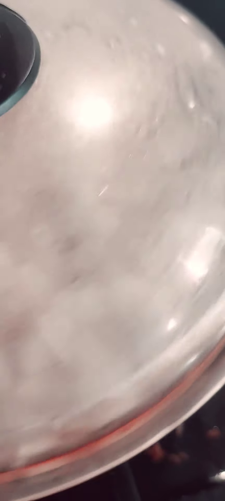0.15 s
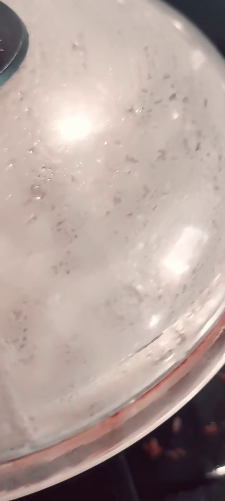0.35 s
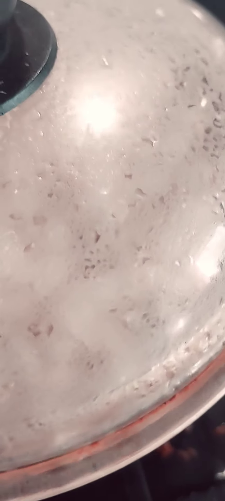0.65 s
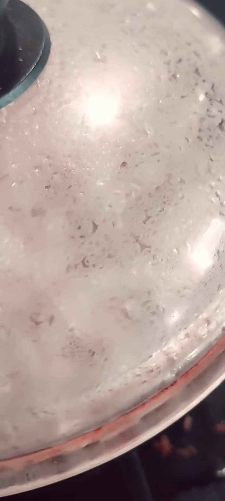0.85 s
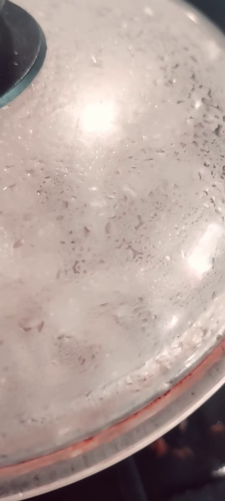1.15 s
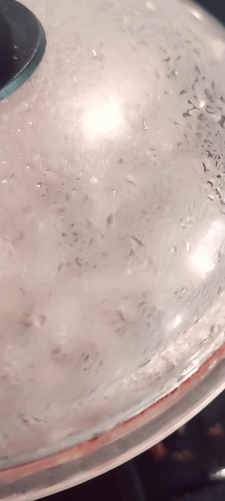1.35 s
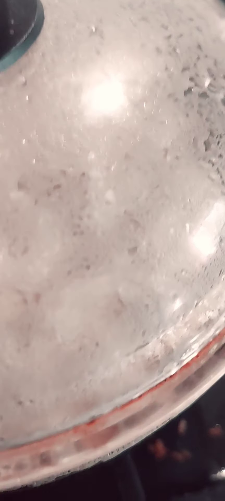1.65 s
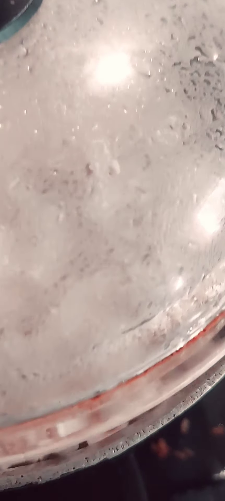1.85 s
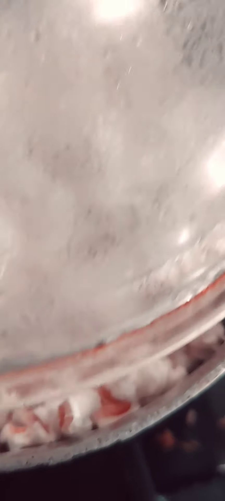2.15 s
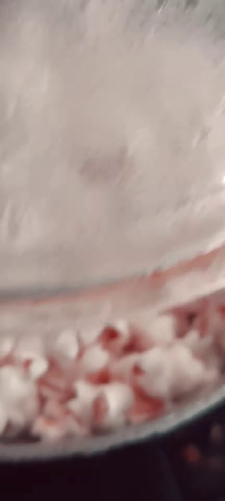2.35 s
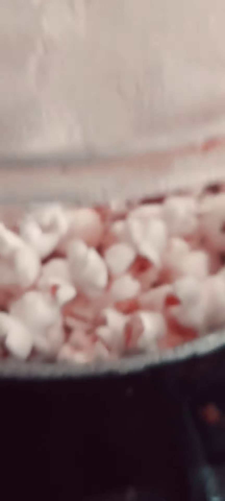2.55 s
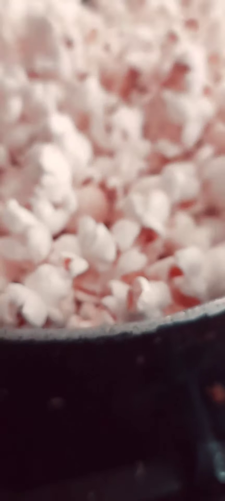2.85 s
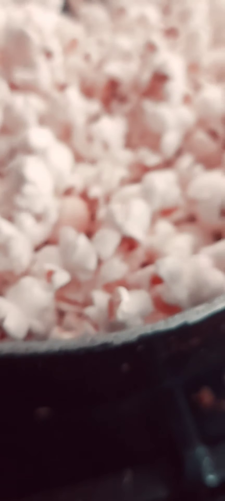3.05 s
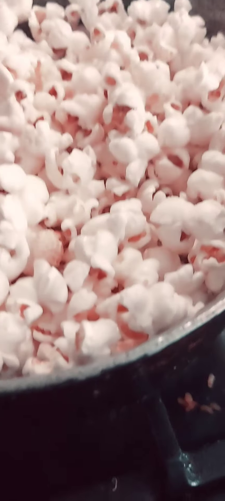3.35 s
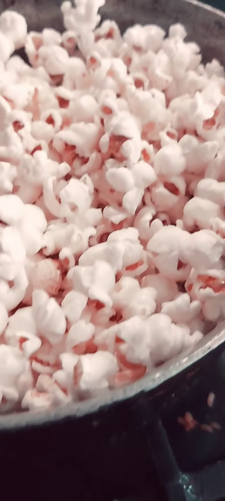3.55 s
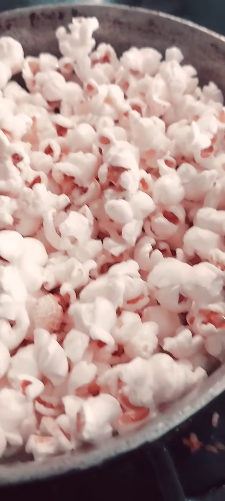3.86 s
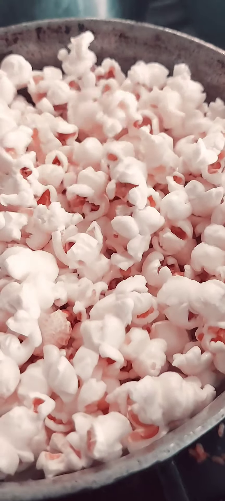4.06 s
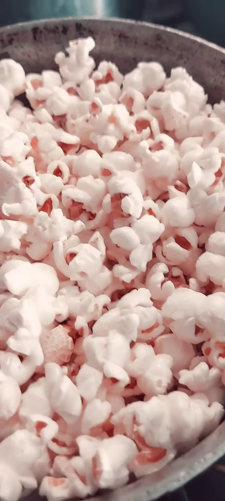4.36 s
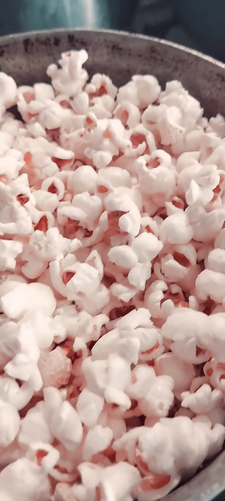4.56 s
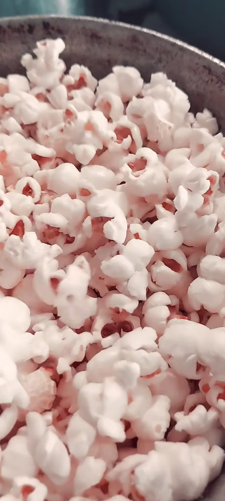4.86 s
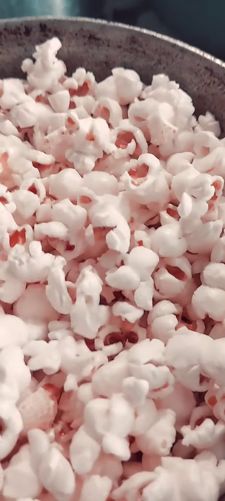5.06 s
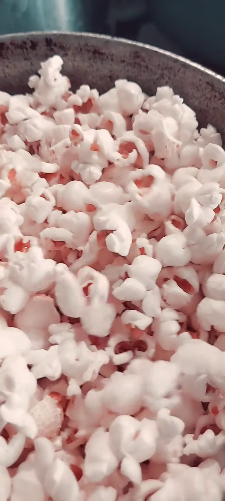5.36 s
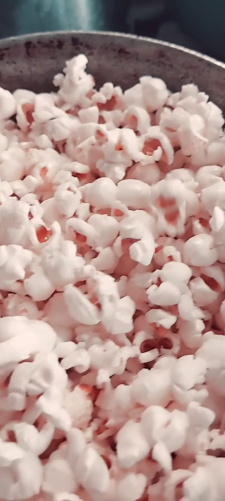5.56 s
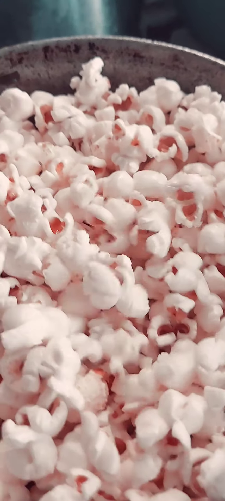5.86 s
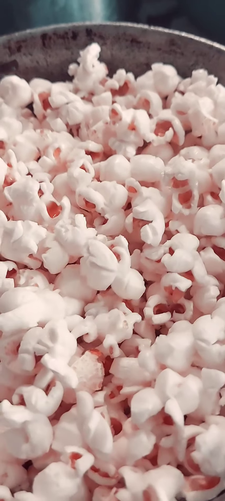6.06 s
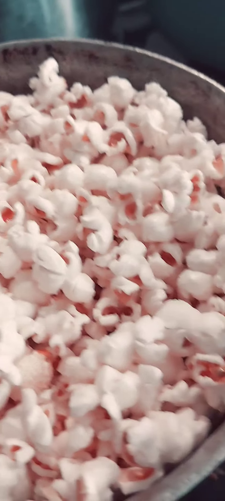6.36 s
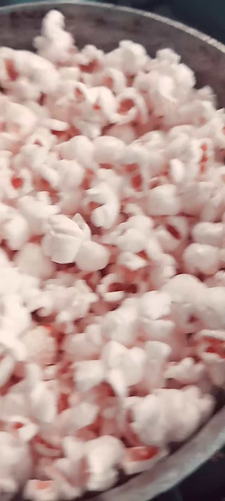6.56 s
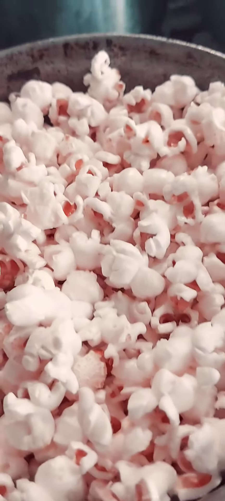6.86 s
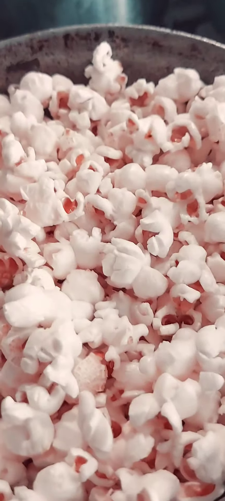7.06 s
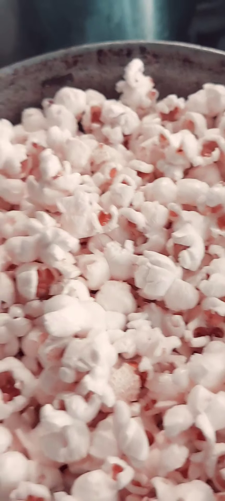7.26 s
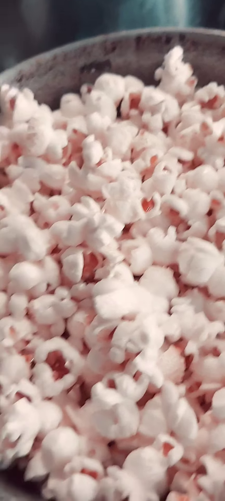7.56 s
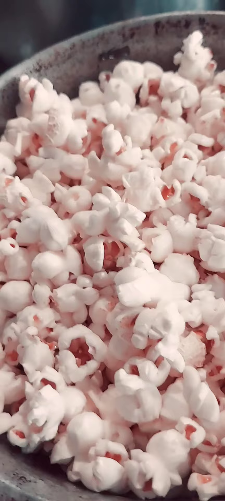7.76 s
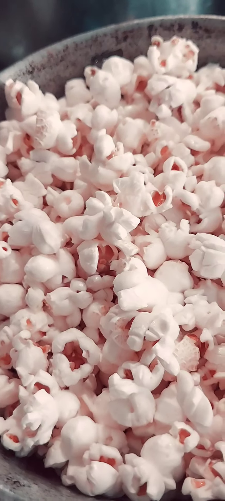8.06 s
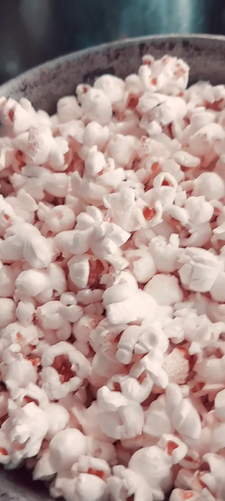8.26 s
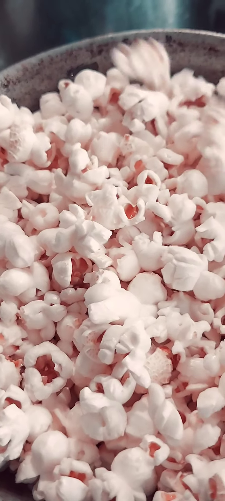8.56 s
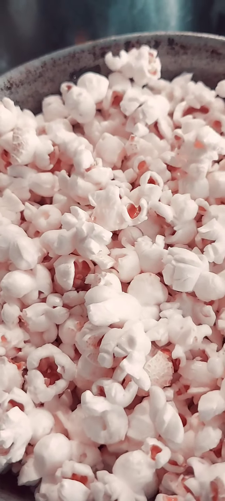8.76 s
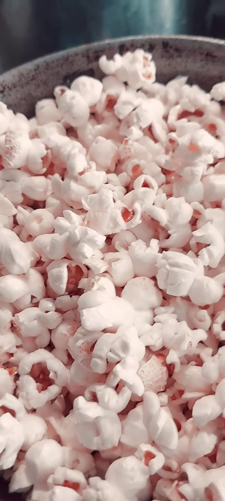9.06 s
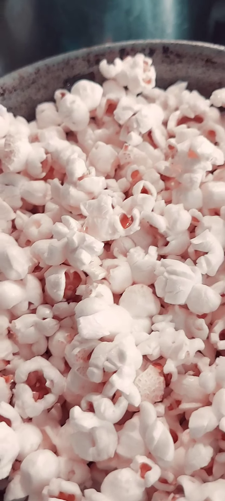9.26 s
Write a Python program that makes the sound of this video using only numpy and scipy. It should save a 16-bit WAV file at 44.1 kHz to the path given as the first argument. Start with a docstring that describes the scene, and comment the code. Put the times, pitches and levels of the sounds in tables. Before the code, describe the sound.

Popcorn bursts with hollow muffled booms under a glass lid, then sharp open cracks, over soft oil sizzle and low stove hum.

```python
"""Popcorn pops in a pot of hot oil near a handheld phone: shaped noise bursts through resonances.
Under the glass lid each pop adds a decaying boom of the pot's air; later pops are open, sharp cracks with echoes.
Some puff steam at the left microphone (slow swing); thrown kernels and flakes tick (short noise).
The lid rings (decaying modes) and its rim rattles (random contacts) as it is set down.
Oil spits and sizzles and the stove hums (coloured noise); kernels squeak faintly (sinking noisy tones)."""
import sys
import numpy as np
from scipy import signal
from scipy.fft import rfft, irfft
from scipy.io import wavfile

SR = 44100
rng = np.random.default_rng(int(sys.argv[2]) if len(sys.argv) > 2 else 0)


def file_out(sig):
    """Save sig as 16-bit WAV at sys.argv[1]."""
    # one column per channel
    cols = np.atleast_2d(sig).T
    # limit, then scale
    lim = np.clip(cols, -1, 1)
    pcm = np.round(lim * 32767).astype(np.int16)
    wavfile.write(sys.argv[1], SR, pcm)


N = 414981
TIME = np.arange(N) / SR
SHOT = 8192  # samples of a short sound
AGE = np.arange(SHOT) / SR

# pops under the seated or tilted lid: start_s, boom_db, boom_hz, crack_db, treble_db (re crack middle)
COVERED_POPS = [(0.0, -28.5, 288, -34.5, 4), (0.096, -12, 287, -16, 1), (0.166, -28, 288, -24.5, 2),
                (0.187, -20.5, 304, -17, 1.5), (0.4, -42, 340, -28.5, -1.5),
                (0.4364, -23.5, 398, -26.5, -0.5), (0.5214, -15.5, 350, -16.5, -0.5),
                (0.686, -33, 388, -21.5, -3), (0.7775, -21.5, 342, -17.5, 1.5),
                (0.885, -27.5, 340, -30, -4), (0.967, -38, 348, -31, 3), (0.981, -24.5, 320, -23, 4),
                (1.1259, -20.5, 320, -25, 1), (1.2156, -16, 333, -24.5, -5.5),
                (1.375, -16.5, 384, -26.5, 2), (1.4337, -24.5, 402, -22.5, -1),
                (1.8348, -31.5, 387, -16, -1), (2.1440, -23.5, 506, -33, 14), (2.2113, -29, 385, -28, -4)]
# pops in the open pot: start_s, crack_db, resonance_hz, hollow_db (re crack), room_db (re crack)
OPEN_POPS = [(1.8346, -20, 3800, -15, -13), (2.144, -24, 6500, -19, -23), (2.2103, -11.5, 2200, -8, -11.5),
             (2.7854, -18.5, 4420, -40, -2), (3.03, -17, 1820, -8.5, -6.5),
             (3.183, -14.5, 4060, -17, -13.5), (3.199, -20.5, 4970, -2.5, -5),
             (3.268, -15.5, 4800, -29, -13), (3.9043, -18.5, 4900, -6, -7), (3.9218, -23, 5850, -10, -2),
             (4.1841, -16, 3400, -8, -14), (4.753, -9.5, 2840, -11, -16), (4.8907, -20.5, 7500, -0.5, -10),
             (4.989, -19, 6150, -10.5, -13), (5.042, -23, 6350, -8, -10.5), (5.1022, -19, 5270, -2.5, -5),
             (5.2185, -19.5, 4630, -8, -8), (5.3436, -14.5, 2730, -8, -8.5), (5.4126, -15, 4300, -10, -9.5),
             (5.4795, -15, 3500, -18, -7.5), (5.8323, -16.5, 5630, -16, -7), (6.241, -14, 3560, -12, -8),
             (6.549, -18, 4050, -7.5, -12.5), (6.656, -17, 3900, -14, -10.5), (6.697, -23, 3360, -2, -4),
             (6.8024, -20, 5600, -5, -14), (7.717, -13, 3400, -4.5, -10.5), (7.8948, -17, 3900, -7.5, -14),
             (8.564, -16, 4600, -10, -4), (8.6902, -13.5, 2500, -5.5, -15.5),
             (9.3136, -13.5, 5300, -6.5, -12)]
# steam puffs at the left microphone: start_s, gain_db
PUFFS = [(2.785, -8), (3.1826, -1.5), (3.269, -3), (5.042, -12.5), (5.1045, -2.5), (5.22, -9), (5.836, -6),
         (6.4268, -23), (6.5501, -11), (6.657, -12), (6.8031, -11), (8.565, -4.5)]
# kernels and flakes that hit the lid, wall or heap: start_s, level_db, resonance_hz
LANDINGS = [(1.961, -30.5, 3720), (2.023, -27.5, 3500), (2.284, -25.5, 2400), (2.3818, -27.5, 5900),
            (2.7542, -28.5, 3630), (3.076, -24, 3880), (3.3446, -24.5, 6240), (3.3952, -25.5, 6040),
            (3.6605, -20.5, 2770), (4.0491, -18, 2300), (4.291, -32.5, 4900), (4.8382, -25.5, 3900),
            (5.0255, -22.5, 6800), (5.201, -19, 1640), (5.5351, -21.5, 1900), (5.5731, -22.5, 5100),
            (6.024, -36, 2480), (6.4269, -21.5, 5600), (6.6336, -23.5, 1670), (6.6808, -26, 7040),
            (6.735, -21.5, 2350), (6.8531, -26.5, 3900), (7.802, -31, 2480), (7.833, -26, 3550),
            (7.927, -31, 4000), (8.632, -22, 4000), (9.352, -22, 2100), (9.4001, -17.5, 1500)]
# kernels against the glass lid: start_s, level_db
LID_TAPS = [(0.5229, -16), (0.686, -28), (0.884, -31), (1.434, -15.5), (2.234, -31)]
# modes of such a clack: mode_hz, relative_db
TAP_MODES = [(1490, -1), (2230, 2), (3700, -9)]
# knocks on the lid: start_s, ring_db, free_ring_share (of t60), clatter_db
LID_KNOCKS = [(0.4374, -23, 1, -21), (1.835, -44, 0.42, -27), (2.146, -35.5, 0.6, -23),
              (2.2093, -37, 0.35, -25.5), (5.255, -29, 0.91, -22), (5.337, -40, 0.41, -27),
              (5.374, -32, 0.3, -13.5), (5.389, -30, 0.22, -23.5)]
# lid modes, free: mode_hz, relative_db, t60_s
LID_MODES = [(300, -7, 0.22), (436, -1, 0.16), (686, -7, 0.17), (766, -4, 0.85), (822, -8, 0.22),
             (1475, -8, 0.07), (2143, -6, 0.13), (2222, 0, 0.26), (3015, -13, 0.36), (3820, -10, 0.2)]
# rim rattle envelope during set-down: time_s, level_db
RATTLE = [(5.334, -28), (5.362, -31), (5.374, -17.5), (5.406, -30)]
# rim resonances as the lid settles: centre_hz, width_hz, gain_db
RIM = [(270, 30, 1), (682, 31, 11), (967, 24, 3.5), (1226, 33, 9.5), (2140, 18, 8), (3800, 160, -1.5)]
# water drops from the lid bursting in the oil: start_s, level_db
SPITS = [(1.2496, -27), (1.357, -29), (1.5379, -37), (1.5522, -27.5), (1.7898, -27.5), (1.966, -30),
         (2.0424, -30.5)]
# steam squeezing out of kernels: start_s, length_s, start_hz, end_hz, level_db
SQUEAKS = [(3.785, 0.19, 5230, 4230, -54), (6.966, 0.23, 4400, 3880, -58), (7.427, 0.17, 4200, 4030, -58),
           (8.346, 0.17, 4640, 4030, -50)]
# background envelopes: time_s, stove_db, sizzle_db, spit_db
BACKGROUND = [(0, -39.5, -47, -56), (.7, -43, -45.5, -42), (1.4, -44, -44.5, -42), (1.8, -46.5, -47, -54),
              (2.6, -45.5, -47, -64), (3.6, -50, -50, -64), (8.3, -49, -49.5, -57.5)]
# standing waves in the air under the lid: wave_hz
AIR_HZ = [273.5, 312.6, 341.3]
# covered-pot resonances: centre_hz, width_hz, gain_db
POT_RESONANCES = [(1535, 110, 16), (2190, 190, 12), (2980, 290, 10.5), (3690, 200, 14)]
# open-pot resonances above the heap: centre_hz, width_hz, gain_db
HOLLOW = [(730, 170, 8), (1024, 270, 2)]
# open crack spectrum: point_hz, gain_db
CRACK = [(150, -7.5), (300, -1), (480, -8), (760, -5.5), (1250, -7), (1600, 1), (2100, 0.5), (3600, 2.5),
         (5200, -3), (7000, 4.5), (9500, 1.5), (15500, -5)]
# covered crack spectrum: point_hz, gain_db
MUFFLED_CRACK = [(300, 8), (900, -9.5), (1400, -17.5), (4000, -22.5), (7000, -22), (15500, -27)]
# lid clatter spectrum: point_hz, gain_db
CLATTER = [(100, -11), (300, 1), (450, -8.5), (680, -0.5), (1000, -11.5), (1800, -14), (3900, -16),
           (5500, -42)]
# room echo spectrum: point_hz, gain_db
ROOM = [(80, -18), (300, 9), (550, 7), (800, 7), (2000, 4), (7000, 6), (10000, 3.5), (15500, 2)]
# stove hum spectrum: point_hz, gain_db
STOVE = [(25, -15), (60, -6), (120, 2), (210, -14), (320, -4), (450, -16), (850, -18.5), (1150, -19),
         (1450, -13.5), (1900, -28.5), (4000, -78)]
# oil sizzle spectrum: point_hz, gain_db
SIZZLE = [(300, -32), (2200, 10), (3000, 11.5), (3400, 21.5), (3900, 13), (6000, 11.5), (7500, 13),
          (9200, 6.5), (11000, 9), (11900, 17), (13000, 8), (14300, 15.5), (14650, 21.5), (14950, 15),
          (15400, 18.5), (15800, -24)]
# phone body's colour at the right microphone: point_hz, gain_db
RIGHT_MICROPHONE = [(300, 2), (1100, -3.5), (2200, 1), (3200, 2), (7000, 2.5), (10000, -1.5), (15000, 0.5)]

# tone of a kernel at MIDDLE_HZ, and its change per octave
MIDDLE_HZ = 3610
BASS_DB, BASS_DB_PER_OCTAVE = -8.5, -1.5
TREBLE_DB, TREBLE_DB_PER_OCTAVE = -5, 8
CRACK_SPAN_S = 0.0033
TOP_HZ = 15900


def covered_pops(boom_cycles=0.89, shorter_per_octave=1.0, crack_t60_s=0.034, crack_bass_db=-8,
                 hum_db=-12.5, hum_t60_s=0.39, reach_hz=48, echo_s=0.025, echo_db=-13):
    """Each burst thumps the air shut in the pot and rattles its walls through the lid."""
    out = np.zeros((2, N))
    for start_s, boom_db, boom_hz, crack_db, treble_db in COVERED_POPS:
        # the higher a gap under the lid tunes the air, the faster the thump dies
        swell = AGE * boom_hz / boom_cycles * (boom_hz / AIR_HZ[1]) ** shorter_per_octave
        thump = swell * np.exp(1 - swell) * np.sin(2 * np.pi * boom_hz * AGE)
        # standing waves near the thump hum on and beat; the lowest lasts longest
        hum = 0
        for hz in AIR_HZ:
            wave = np.sin(2 * np.pi * (hz * AGE + rng.random() / 2))
            nearness = 1 / (1 + ((hz - boom_hz) / reach_hz) ** 2)
            hum = hum + wave * fade(AGE, hum_t60_s * (AIR_HZ[0] / hz) ** 2) * nearness
        boom = level(thump + undb(hum_db) * hum * (1 - np.exp(-swell / 2)), boom_db, 0.022)
        crack = colour(grit() * fade(AGE, crack_t60_s), MUFFLED_CRACK)
        # each kernel's place shifts the resonances and their proportions
        resonances = [(hz * rng.normal(1, .02), width_hz, db + rng.normal(0, 4))
                      for hz, width_hz, db in POT_RESONANCES]
        crack = crack + body(crack, resonances)
        add(out, start_s, boom + balance(crack, crack_db, crack_bass_db, treble_db))
        # strongest single echo
        add(out, start_s + echo_s, undb(echo_db) * level(thump, boom_db, 0.01))
    return out


def open_pops(lead_s=.0014, split_db=-16, hold_s=0.00014, burst_t60_s=0.011, rattle_db=-22,
              rattle_t60_s=0.074, peak_db=5, width_hz=300, pan_db=6, room_bass_db=1.0, room_peak_db=-3):
    """The hull splits, then steam bursts out, sounds the pot's hollow and echoes round the kitchen."""
    out = np.zeros((2, N))
    since_s = np.maximum(AGE - lead_s - hold_s, 0)
    burst = fade(since_s, burst_t60_s) + undb(rattle_db) * fade(since_s, rattle_t60_s)
    envelope = np.where(AGE < lead_s, undb(split_db) * AGE / lead_s, burst)
    for start_s, crack_db, hz, hollow_db, room_db in OPEN_POPS:
        bass_db, treble_db = kernel_tone(hz)
        crack = colour(grit() * envelope, CRACK)
        hollow = level(band(body(crack, HOLLOW), 600, 1300), crack_db + hollow_db, CRACK_SPAN_S)
        # the kernel's place in the heap decides which resonance and echoes reach the phone
        crack = crack + undb(peak_db) * resonate(crack, hz, width_hz)
        direct = balance(crack, crack_db, bass_db, treble_db) + hollow
        add(out, start_s - lead_s, ports(direct, pan_db, apart=.75))
        tail = colour(echoes(), CRACK)
        tail = tail + undb(room_peak_db) * resonate(tail, hz, width_hz) + body(tail, HOLLOW)
        tail = balance(tail, crack_db + room_db, bass_db + room_bass_db, treble_db)
        add(out, start_s, colour(tail, ROOM))
    return out


def puffs(hz=48, t60_s=0.049, onset_s=0.00024, right_db=-28, thump_db=-15, thump_hz=310, thump_t60_s=0.036):
    """A push of steam thumps the pot and makes the microphone swing slowly for a cycle or two."""
    out = np.zeros((2, N))
    swing = np.cos(2 * np.pi * hz * AGE + 0.45) * fade(AGE, t60_s) * (1 - np.exp(-AGE / onset_s))
    swing += undb(thump_db) * np.sin(2 * np.pi * thump_hz * AGE) * fade(AGE, thump_t60_s)
    for start_s, gain_db in PUFFS:
        add(out, start_s, undb([[gain_db], [gain_db + right_db]]) * swing)
    return out


def landings(t60_s=0.0031, ring_db=-23, ring_t60_s=0.043, peak_db=2, width_hz=600,
             thin_db_per_octave=-3, bright_db=1, hollow_db=5.0, pan_db=6):
    """A kernel or flake lands: a dry tick with a short ring, higher and thinner the smaller it is."""
    out = np.zeros((2, N))
    envelope = fade(AGE, t60_s) + undb(ring_db) * fade(AGE, ring_t60_s)
    for start_s, tick_db, hz in LANDINGS:
        bass_db, treble_db = kernel_tone(hz)
        bass_db += hollow_db + thin_db_per_octave * np.log2(hz / MIDDLE_HZ)
        tick = colour(grit() * envelope, CRACK)
        tick = tick + undb(peak_db) * resonate(tick, hz, width_hz) + body(tick, HOLLOW)
        tick = balance(tick, tick_db, bass_db, treble_db + bright_db)
        add(out, start_s, ports(tick, pan_db, apart=0.95))
    return out


def lid_taps(t60_s=0.028):
    """A kernel shot against the glass lid: a short, dry clack of decaying modes."""
    out = np.zeros((2, N))
    for start_s, tap_db in LID_TAPS:
        clack = sum(undb(mode_db) * np.sin(2 * np.pi * (hz * AGE + rng.random((2, 1)) / 2))
                    for hz, mode_db in TAP_MODES)
        add(out, start_s, level(clack * fade(AGE, t60_s), tap_db, CRACK_SPAN_S))
    return out


def lid(clatter_t60_s=0.17, contacts_per_s=1200, onset_s=0.00027, hard_db=-17.0,
        dulling_per_octave=0.47, split=0.01):
    """The glass lid rings at every knock, shorter when held, and its rim chatters on what it touches."""
    out = np.zeros((2, N))
    t = TIME[:SR]
    for start_s, ring_db, free_share, clatter_db in LID_KNOCKS:
        # a gentler knock wakes the high modes less
        tilt_db = dulling_per_octave * (ring_db - hard_db)
        ring = 0
        for hz, mode_db, t60_s in LID_MODES:
            mode = np.sin(2 * np.pi * (hz * t + rng.random()))
            # the lid is not quite round: a weaker, shorter twin beats with each mode
            twin = .5 * fade(t, t60_s) * np.sin(2 * np.pi * (hz * (1 + split) * t + rng.random()))
            gain = undb(mode_db + tilt_db * max(np.log2(hz / 800), 0))
            ring = ring + gain * fade(t, t60_s * free_share) * (mode + twin)
        ring = undb(ring_db) * ring * (1 - np.exp(-t / onset_s))
        contacts = (rng.random(len(t)) < contacts_per_s / SR) * rng.standard_normal((2, len(t)))
        clatter = level(colour(contacts * fade(t, clatter_t60_s), CLATTER), clatter_db, 0.011)
        add(out, start_s, ring + ports(clatter, 0.54, apart=0.23))
    return out


def rim_rattle(contacts_per_s=400):
    """The lid's steel rim skitters in a dense run of tiny contacts as it is set down, and rings on."""
    time_s, rattle_db = np.transpose(RATTLE)
    contacts = (rng.random(N) < contacts_per_s / SR) * rng.standard_normal((2, N))
    force = undb(np.interp(TIME, time_s, rattle_db, left=-np.inf, right=-np.inf))
    rattle = body(contacts * force, RIM) / np.std(body(contacts, RIM))
    return ports(rattle, 0, apart=0.84)


def spits(t60_s=0.0086, low_hz=5500):
    """A larger drop bursts in the oil: one thin, bright snap."""
    out = np.zeros((2, N))
    for start_s, snap_db in SPITS:
        snap = band(grit() * fade(AGE, t60_s), low_hz, TOP_HZ)
        add(out, start_s, level(snap, snap_db, 0.003))
    return out


def squeaks(width_hz=130, strand_step=1.13, strand_db=-3, count=3):
    """Steam leaks through a split hull: faint, breathy whistles that sink as the pressure drops."""
    out = np.zeros((2, N))
    lowpass = signal.butter(2, width_hz, fs=SR, output="sos")
    for start_s, length_s, start_hz, end_hz, squeak_db in SQUEAKS:
        progress = np.linspace(0, 1, int(length_s * SR))
        phase = 2 * np.pi * np.cumsum(start_hz + (end_hz - start_hz) * progress) / SR
        for k in range(count):
            flutter = signal.sosfilt(lowpass, rng.standard_normal((2, len(progress))))
            # higher strands are weaker and peak earlier
            swell = np.sin(np.pi * progress) * (1 - progress) ** k
            strand = flutter * np.sin(phase * strand_step ** k) * swell
            add(out, start_s, level(strand, squeak_db + k * strand_db, length_s))
    return out


def stove_and_oil(spread_db=5, drops_per_s=700, drop_decay_s=0.00034, low_band_db=-6):
    """The stove hums; oil fizzes evenly and spits droplets, most while water drips from the lid."""
    time_s, *columns = np.transpose(BACKGROUND)
    stove_db, sizzle_db, spit_db = (np.interp(TIME, time_s, column) for column in columns)
    hum = level(colour(rng.standard_normal((2, N)), STOVE), 0, N / SR)
    fizz = level(colour(rng.standard_normal((2, N)), SIZZLE), 0, N / SR)
    sizes = undb(spread_db * np.minimum(rng.exponential(size=N), 5))
    drops = (rng.random(N) < drops_per_s / SR) * sizes
    envelope = signal.lfilter([1], [1, -np.exp(-1 / (drop_decay_s * SR))], drops)
    spit = envelope * rng.standard_normal((2, N))
    # ticks at the top of the range over a weaker lower band
    spit = band(spit, 10500, 16500) + undb(low_band_db) * band(spit, 4500, 9000)
    spit = level(spit, 0, N / SR)
    return ports(hum, 1.0, apart=0.015) * undb(stove_db) + fizz * undb(sizzle_db) + spit * undb(spit_db)


def kitchen(x):
    """Reverberate x by convolution with coloured, decaying noise echoes."""
    response = colour(level(echoes(), 0, 1 / SR), ROOM)
    return signal.fftconvolve(x[None], response, axes=-1)[:, :N]


def echoes(t60_s=0.35, onset_s=0.00047, uneven_db=3.5, size=64):
    """A small hard room: lumpy clusters of echoes, different at each microphone."""
    t = TIME[:SR // 3]
    clusters = np.repeat(undb(uneven_db * rng.standard_normal(len(t) // size + 1)), size)[:len(t)]
    envelope = fade(t, t60_s) * (1 - np.exp(-(t / onset_s) ** 2))
    return rng.standard_normal((2, len(t))) * clusters * envelope


def kernel_tone(hz):
    """Bass and treble dB re middle: a higher kernel resonance has more treble and less bass."""
    octaves = np.log2(hz / MIDDLE_HZ)
    return BASS_DB + BASS_DB_PER_OCTAVE * octaves, TREBLE_DB + TREBLE_DB_PER_OCTAVE * octaves


def balance(x, db, bass_db, treble_db):
    """Set the bass, middle and treble of a short crack; db is the middle's level."""
    bands = (170, 1500, bass_db), (1500, 5500, 0), (5500, 17000, treble_db)
    return sum(level(band(x, low_hz, high_hz), db + rel_db, CRACK_SPAN_S) for low_hz, high_hz, rel_db in bands)


def grit(uneven_db=4, size=32):
    """Two short noises whose strength jumps from one grain of size samples to the next."""
    grains = np.repeat(undb(uneven_db * rng.standard_normal(SHOT // size)), size)
    return rng.standard_normal((2, SHOT)) * grains


def body(x, resonances):
    """Pass x through parallel (centre_hz, width_hz, gain_db) resonances."""
    return sum(undb(db) * resonate(x, hz, width_hz) for hz, width_hz, db in resonances)


def resonate(x, hz, width_hz):
    """One resonance, gain 1 at its centre."""
    return signal.lfilter(*signal.iirpeak(hz, hz / width_hz, fs=SR), x)


def band(x, low_hz, high_hz):
    """Band-pass."""
    return signal.sosfilt(signal.butter(3, [low_hz, high_hz], "band", fs=SR, output="sos"), x)


def colour(x, points):
    """Causal minimum-phase filter with the given (point_hz, gain_db) spectrum, via its cepstrum."""
    hz, db = np.transpose(points)
    grid_hz = np.arange(SHOT // 2 + 1) * SR / SHOT
    gain = undb(np.interp(np.log(grid_hz + 1), np.log(hz), db))
    cepstrum = irfft(np.log(gain))
    # fold onto positive time
    cepstrum[1:SHOT // 2] *= 2
    cepstrum[SHOT // 2 + 1:] = 0
    response = irfft(np.exp(rfft(cepstrum)))
    y = signal.fftconvolve(np.atleast_2d(x), response[None], axes=-1)
    return y[:, :x.shape[-1]].reshape(x.shape)


def fade(t, t60_s):
    """Exponential decay, 60 dB down at t60_s."""
    return np.exp(-np.log(1000) * t / t60_s)


def undb(db):
    """Decibels to gain."""
    return 10 ** (np.asarray(db) / 20)


def level(x, db, span_s):
    """Scale x to the energy of a sound of db rms that lasts span_s."""
    power = np.sum(x ** 2, axis=-1, keepdims=True) / (span_s * SR)
    return x * undb(db) / np.sqrt(power + 1e-18)


def add(out, start_s, x):
    """Mix x into out from start_s on."""
    start = max(int(start_s * SR), 0)
    length = min(x.shape[-1], N - start)
    out[..., start:start + length] += x[..., :length]


def ports(pair, pan_db, apart, lag_s=.00018):
    """Two microphones: the right one hears the sound a little later and partly by other paths."""
    apart = np.clip(apart, 0, 1)
    right = np.sqrt(1 - apart) * pair[0] + np.sqrt(apart) * pair[1]
    samples = np.arange(len(right))
    right = np.interp(samples - lag_s * SR, samples, right, left=0)
    gains = undb([pan_db / 2, -pan_db / 2])
    return np.array([pair[0], right]) * gains[:, None] / np.sqrt(np.mean(gains ** 2))


def scene(covered_room_db=-13.5, lid_room_db=-13.0, tick_room_db=-17):
    """All sources and their share of the room."""
    covered = covered_pops()
    knocks = lid() + rim_rattle()
    ticks = landings() + lid_taps() + spits()
    # the boom stays trapped under the lid, so mostly the crack reaches the walls
    escaped = band(covered[0], 600, 17000) + undb(-9) * covered[0]
    send = undb(covered_room_db) * escaped + undb(lid_room_db) * knocks[0] + undb(tick_room_db) * ticks[0]
    left, right = covered + open_pops() + ticks + knocks + kitchen(send)
    coloured = np.array([left, colour(right, RIGHT_MICROPHONE)])
    return coloured + puffs() + squeaks() + stove_and_oil()


def record(dry, low_cut_hz=40):
    """The phone drops the deepest bass, clips the highest peaks and cuts the top."""
    sound = signal.sosfilt(signal.butter(2, low_cut_hz, "high", fs=SR, output="sos"), dry)
    clipped = np.clip(sound, -1, 1)
    return signal.sosfilt(signal.ellip(8, .2, 70, TOP_HZ, fs=SR, output="sos"), clipped)


dry = scene()
out = record(dry)
file_out(out)
```